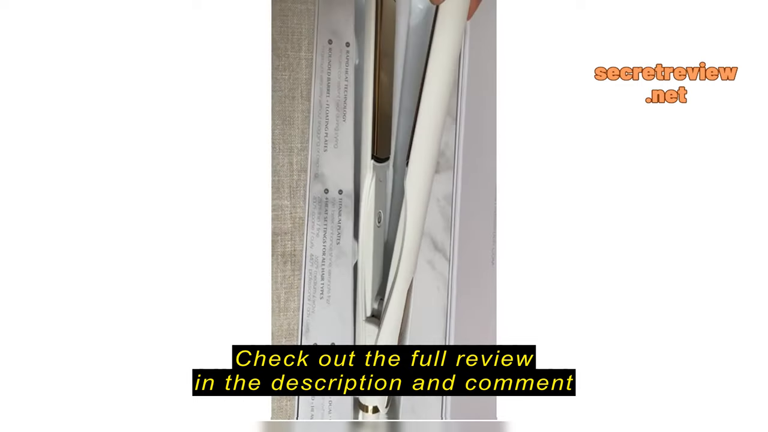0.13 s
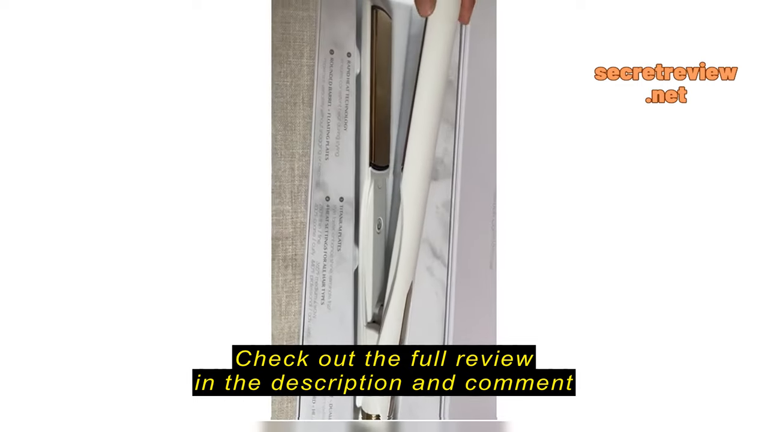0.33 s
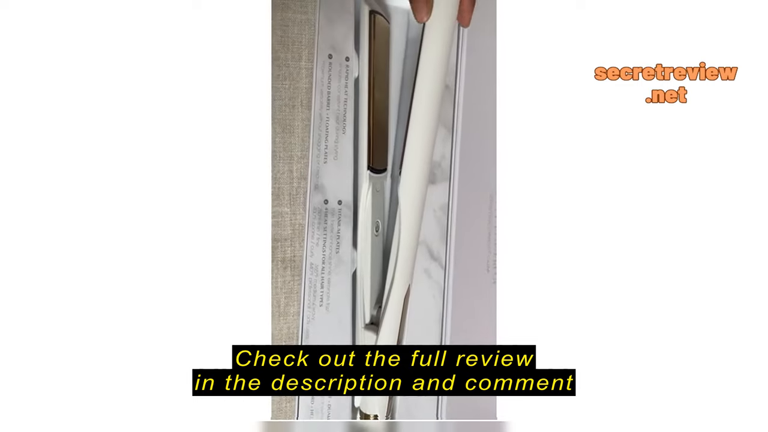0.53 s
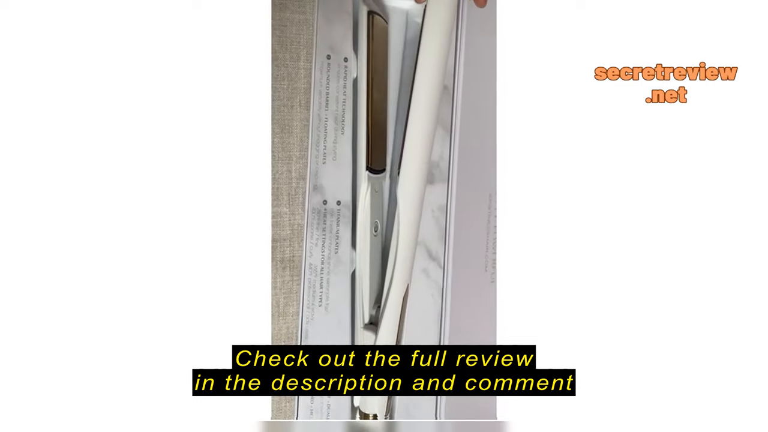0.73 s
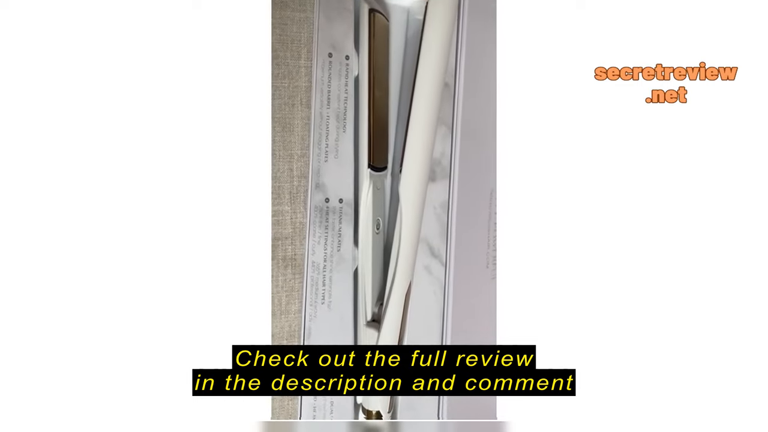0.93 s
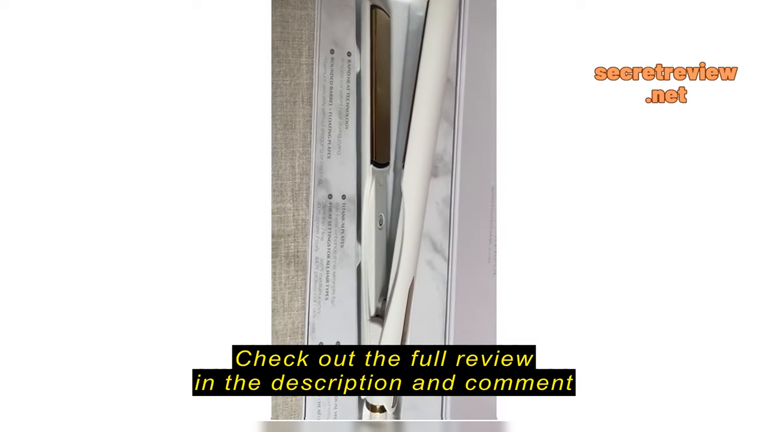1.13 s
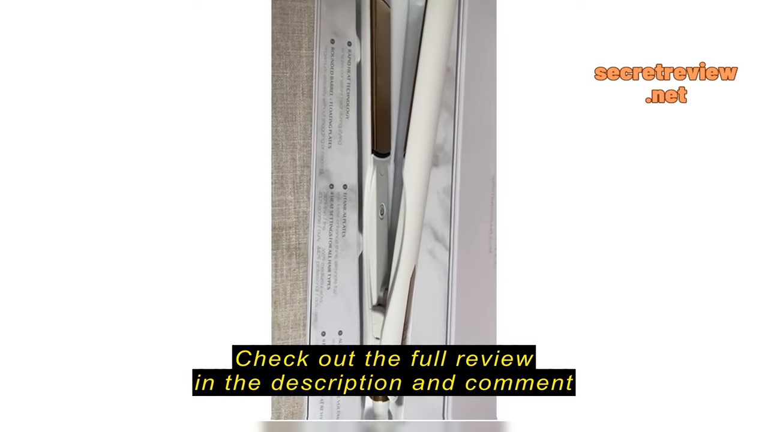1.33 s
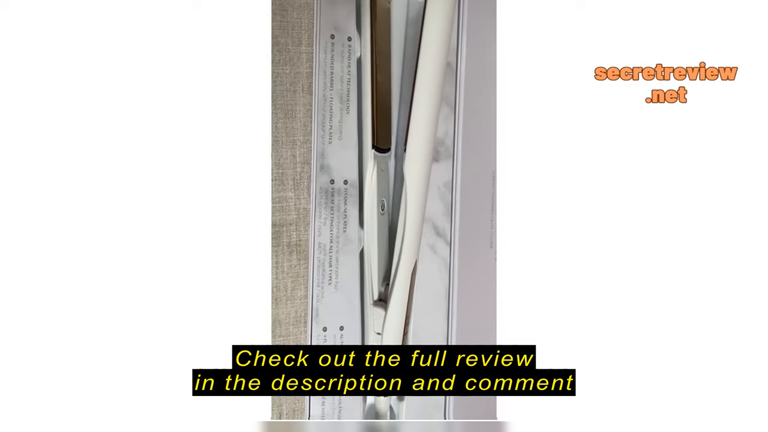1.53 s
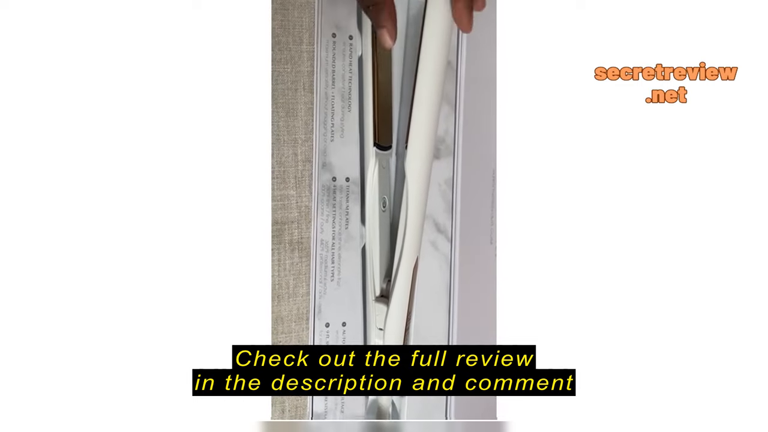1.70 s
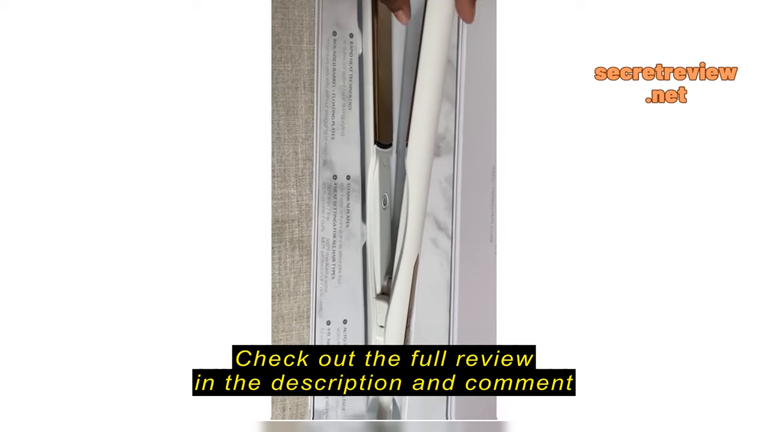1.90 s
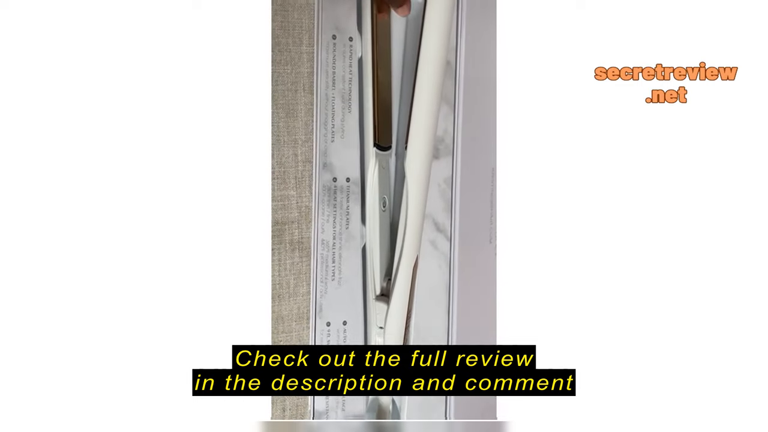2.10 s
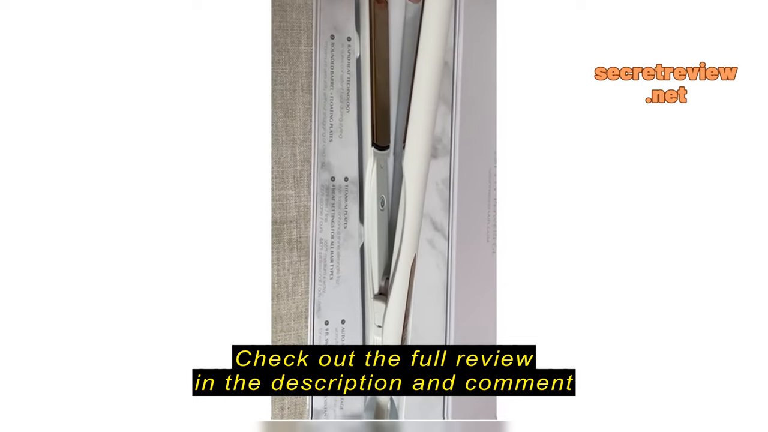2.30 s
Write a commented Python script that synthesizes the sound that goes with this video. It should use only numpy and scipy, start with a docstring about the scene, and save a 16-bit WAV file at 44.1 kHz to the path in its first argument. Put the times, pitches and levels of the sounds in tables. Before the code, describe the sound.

Plastic clacks and dull knocks as a hair straightener is set down on its cardboard box.

```python
"""Hair straightener on its cardboard box

The tool is laid down and nudged about, close to a two-port microphone in a small quiet room.
Each contact thumps the box, clacks the plastic arms, rings the heating plates and gives a short crack.
Between contacts the tool slides on the lid. The room hums and hisses faintly; one faint blip sounds."""
import sys
import numpy as np
from scipy import signal
from scipy.fft import rfft, irfft, next_fast_len
from scipy.io import wavfile
from scipy.ndimage import map_coordinates

SR = 44100
rng = np.random.default_rng(int(sys.argv[2]) if len(sys.argv) > 2 else 0)


def transcribe(u):
    """Save the signal u as a 16-bit wav file named by the first command-line argument.

    u: samples, shape (n,) or (channels, n), limited to [-1, 1]; the rate is SR.
    q: integer samples, one column per channel.
    """
    v = np.clip(np.atleast_2d(u).T, -1, 1)
    q = np.round(v * 32767).astype(np.int16)
    wavfile.write(sys.argv[1], SR, q)


N = 103635

# left-right likeness of diffuse sound: freq_hz, coherence
DIFFUSE_COHERENCE = [(100, 1), (350, .96), (600, 0.19), (1100, 0.94), (2000, 0.19), (4500, 0.48),
                     (10000, 0.067)]


def amp(db):
    """Decibels to gain."""
    return 10 ** (np.asarray(db) / 20)


def unit(x):
    """Scale to rms 1."""
    return x / np.sqrt(np.mean(x ** 2) + 1e-20)


def along(points, hz):
    """Interpolate (freq_hz, value) points on a log axis."""
    freq_hz, values = np.transpose(points)
    return np.interp(np.log(hz + 1), np.log(freq_hz + 1), values)


def wobble(knots_per_s):
    """Smooth random curve."""
    knots = rng.standard_normal(int(N * knots_per_s / SR) + 4)
    return map_coordinates(knots, [np.arange(N) * knots_per_s / SR])


def filtered(x, response):
    """Apply response(hz) by FFT."""
    n = x.shape[-1]
    size = next_fast_len(n + SR // 4)
    return irfft(rfft(x, size) * response(np.fft.rfftfreq(size, 1 / SR)), size)[..., :n]


def coloured(x, spectrum):
    """Apply a (freq_hz, gain_db) curve."""
    return filtered(x, lambda hz: amp(along(spectrum, hz)))


def diffuse(n, coherence=DIFFUSE_COHERENCE):
    """White stereo noise of given left-right coherence."""
    def mid_side_gains(hz):
        angle = np.arccos(np.clip(along(coherence, hz), -1, 1)) / 2
        return np.array([np.cos(angle), np.sin(angle)])
    mid, side = filtered(rng.standard_normal((2, n)), mid_side_gains)
    return np.array([mid + side, mid - side])


def noise(n, spectrum, coherence=DIFFUSE_COHERENCE):
    """Coloured stereo noise, rms 1."""
    return unit(coloured(diffuse(n, coherence), spectrum))


def add(track, start_s, sound):
    """Mix a sound into the track."""
    i = max(round(start_s * SR), 0)
    track[:, i:i + sound.shape[-1]] += sound[..., :N - i]


def ring(modes, t, attack_s, pitch_ratio=1):
    """Damped modes; neighbours swing in opposite directions."""
    swing = sum((-1) ** k * amp(db - 60 * t / t60_s) * np.sin(2 * np.pi * hz * pitch_ratio * t)
                for k, (hz, db, t60_s) in enumerate(modes))
    return swing * (1 - np.exp(-t / attack_s))


def radiated(x, corner_hz=130):
    """Small objects radiate little bass."""
    return signal.sosfilt(signal.butter(2, corner_hz, 'highpass', fs=SR, output='sos'), x)


def ports(x, right_lead):
    """Each microphone port has its own colour and phase."""
    # port balance: freq_hz, left_over_right_db
    balance = [(100, -1.5), (350, 2.7), (600, 2), (1100, 1), (2200, 0.4), (5000, 0.1), (10000, -.3)]
    half = np.array([[.5], [-.5]])
    return filtered(x, lambda hz: amp(half * along(balance, hz))
                    * np.exp(-1j * half * along(right_lead, hz)))


def room(x, early_db=-8.5, early_t60_s=.049, late_db=-10.5, predelay_s=.008):
    """Reflections: near surfaces answer quickly, the walls with a longer tail."""
    # wall decay: freq_hz, t60_s
    wall_decay = [(150, 0.64), (500, 0.24), (1200, 0.34), (3000, 0.27), (6000, 0.32), (12000, 0.31)]
    # early reflections: freq_hz, gain_db
    early_colour = [(200, -16), (400, 3), (600, 4), (1100, -2.5), (2000, 2.5), (2550, -3), (3300, 2.5),
                    (8000, 0.5)]
    n = x.shape[-1]
    t = np.arange(n) / SR
    band_hz, frame_s, bands = signal.stft(diffuse(n), SR, nperseg=256)
    band_decay = amp(-60 * frame_s / along(wall_decay, band_hz)[:, None])
    late = signal.istft(bands * band_decay, SR, nperseg=256)[1][:, :n]
    early = coloured(unit(diffuse(n)), early_colour) * unit(amp(-60 * t / early_t60_s))
    impulse = (amp(early_db) * early + amp(late_db) * unit(late)) / np.sqrt(n)
    impulse = np.pad(impulse, ((0, 0), (round(predelay_s * SR), 0)))
    # a small hard surface nearby returns little bass
    echo_s, echo_db, low_cut_hz = .0112, -12, 1800
    echo = filtered(x, lambda hz: 1j * hz / (low_cut_hz + 1j * hz) * np.exp(-2j * np.pi * hz * echo_s))
    return amp(echo_db) * echo + signal.fftconvolve(x, impulse, axes=1)[:, :n]


def room_air(gain_db=-48.5):
    """Soft room noise, strongest in the bass."""
    # room noise: freq_hz, level_db
    spectrum = [(15, -85), (25, -37), (43, -17), (56, -2), (86, -5), (183, -7.5), (209, -3.5), (246, -8),
                (289, -9.5), (378, -7.5), (631, -12), (1170, -14), (2060, -16.5), (2490, -15.5),
                (4750, -25), (5580, -29), (7300, -35), (10900, -43), (13000, -51), (15500, -72)]
    # left-right likeness: freq_hz, coherence
    coherence = [(100, 1), (330, 0.93), (600, 1), (1100, 0.79), (2200, 0.28), (4500, 0.14), (10000, 1)]
    # right port phase: freq_hz, lead_rad
    right_lead = [(100, -1.5), (380, 1), (600, 2), (1100, 2), (2200, 3), (4500, -0.6), (9000, 5)]
    return amp(gain_db) * ports(noise(N, spectrum, coherence), right_lead)


def hum(gain_db=.5, waver_depth=.81):
    """Low hum lines, wavering in level and phase."""
    # hum lines: pitch_hz, level_db
    lines = [(73, -61), (99.5, -54), (139, -60.5)]
    t, out = np.arange(N) / SR, np.zeros(N)
    for hz, db in lines:
        waver = 1 + waver_depth * wobble(6.44)
        out += amp(db) * unit(waver * np.cos(2 * np.pi * hz * t + wobble(5.46)))
    return amp(gain_db) * out


def drone(pitches_hz=(219, 289.2), waver_rad=.39):
    """Two tones above the hum swell and fade."""
    # tone envelopes: time_s, lower_db, upper_db
    envelopes = [(0, -51, -46), (.2, -49.5, -65), (.6, -47.5, -67), (.78, -78, -59), (.95, -57.5, -62.5),
                 (1.09, -54.5, -52), (1.3, -44.5, -60), (1.45, -63, -61), (1.58, -76, -50.5),
                 (1.72, -73, -57.5), (1.87, -57.5, -63.5), (2.05, -50, -51), (2.22, -54.5, -65),
                 (2.35, -50.5, -53)]
    time_s, *levels_db = np.transpose(envelopes)
    t, out = np.arange(N) / SR, np.zeros(N)
    for hz, db in zip(pitches_hz, levels_db):
        tone = unit(np.cos(2 * np.pi * hz * t + waver_rad * wobble(8.13)))
        out += amp(np.interp(t, time_s, db)) * tone
    return out


def blip(start_s=.6445, level_db=-34.5, top_hz=2000, glide_s=.00133, fall_s=.012):
    """Faint falling blip, opposite in polarity left and right."""
    t = np.maximum(np.arange(N) / SR - start_s, 0)
    hz = top_hz / (1 + t / glide_s) * (t > 0)
    chirp = np.sin(2 * np.pi * np.cumsum(hz) / SR)
    return np.array([[1], [-1]]) * amp(level_db) * np.exp(-t / fall_s) * chirp


def rattle(ticks_per_s=440, low_hz=990, high_hz=6540, t60_s=.0089, spread_db=5):
    """Tiny loose contacts of the plastic, each at its own pitch; rms 1."""
    out, t = np.zeros((2, N)), np.arange(SR // 40) / SR
    for place, size, pitch in rng.random((int(ticks_per_s * N / SR), 3)):
        hz = low_hz * (high_hz / low_hz) ** pitch
        envelope = amp(spread_db * size ** 2 - 60 * t / t60_s)
        add(out, place * N / SR, envelope * np.sin(2 * np.pi * hz * t))
    return unit(out)


def slides(grain_db=1.5, rub_db=3, rattle_db=-3.5):
    """Uneven friction drums the lid, makes it groan, rubs, rattles the plastic and hisses."""
    # strokes on the lid: peak_s, rise_s, fall_s, drum_db, scrape_db, hiss_db, groan_db
    strokes = [(.2475, .004, .006, -33, -44, -30.5, -34), (.012, .033, .049, -29, -46.5, -53, -42),
               (.301, .004, .033, -31, -28, -47, -32), (.417, .011, .017, -30, -31.5, -36.5, -27),
               (.497, .012, .075, -39, -43.5, -53.5, -38), (.715, .03, .03, -62, -68, -63, -62),
               (1.262, .04, .035, -49, -54, -63, -45), (1.295, .02, .03, -47, -58, -67.5, -42)]
    # friction spectra: freq_hz, level_db
    drum_spectrum = [(30, -24), (80, -5.5), (140, -1.5), (200, -4.5), (310, 3), (520, -15), (750, -20.5),
                     (1300, -23), (3000, -45), (8000, -73)]
    rub_spectrum = [(200, -1.5), (700, -6), (1200, -9), (2000, -4), (3200, 2), (5000, -10), (7000, -21),
                    (14000, -39)]
    hiss_spectrum = [(1500, -6), (5000, 2.5), (7200, 0), (10000, 3.5), (12700, -2), (14000, -21),
                     (15000, -7), (16000, -27)]
    groan_spectrum = [(250, -28), (410, -2.5), (472, 0.5), (550, -15), (680, -21.5), (800, -14.5),
                      (950, -16.5), (1400, -30), (4000, -73)]
    t, out = np.arange(N) / SR, np.zeros((2, N))
    drum, rub = noise(N, drum_spectrum), noise(N, rub_spectrum)
    hiss, groan = noise(N, hiss_spectrum), noise(N, groan_spectrum)
    grain = amp(grain_db * wobble(knots_per_s=250))
    scrape = amp(rub_db) * grain * rub + amp(rattle_db) * rattle()
    for peak_s, rise_s, fall_s, drum_db, scrape_db, hiss_db, groan_db in strokes:
        envelope = np.exp(-np.where(t < peak_s, ((peak_s - t) / rise_s) ** 2, (t - peak_s) / fall_s))
        lid = amp(drum_db) * drum + amp(groan_db) * groan
        surface = amp(scrape_db) * scrape + amp(hiss_db) * grain * hiss
        out += envelope * (lid + surface)
    return out


def snaps():
    """Hard edges meet with a very short ping; its pitch depends on the spot."""
    # edge contacts: start_s, level_db, pitch_hz, t60_s
    pings = [(.2958, -14.5, 6160, 0.0051), (.2966, -11.5, 3560, .005), (0.2972, -1, 1390, 0.0012),
             (.3076, -1, 1400, 0.00099), (0.4027, -18, 6550, 0.0017), (.494, -19, 2530, .01),
             (1.084, -32, 1860, .01), (1.2475, -30, 1820, 0.014), (1.414, -28, 5660, 0.0056)]
    out, t = np.zeros((2, N)), np.arange(SR // 2) / SR
    for start_s, db, hz, t60_s in pings:
        ping = radiated(amp(db - 60 * t / t60_s) * np.sin(2 * np.pi * hz * t))[None]
        add(out, start_s, ping + room(ping))
    return out


def knocks(thud_attack_s=.00078, tool_attack_s=.00013, boom_attack_s=.0052, crack_t60_s=.034):
    """Crack, arms and plates sound at once; the box thuds just after, and the room booms."""
    # tool on box: start_s, thud_db, clack_db, plate_db, crack_db, thud_pitch_ratio, clack_pitch_ratio
    contacts = [(.003, -16, -45, -58, -37, 0.81, 1.14), (0.211, -34, -62, -68, -49, 1.24, .7),
                (0.2402, -6.5, -19, -56, -33, 0.73, 1.04), (0.2588, -8, -36, -56, -28, 0.92, 1),
                (0.2949, -46, -30, -20, -16.5, 0.87, 1.24), (0.2965, .5, -13, -20, -18, .88, 0.9),
                (.3045, -5.5, -7.5, -51, -39, 1, 0.922), (0.3114, -8.5, -35, -23, -21.5, 0.92, 1.04),
                (0.396, -43, -13.5, -49, -48, 1.4, 1.2), (0.4023, 2.5, -0.5, -25, -25.5, 0.99, 0.998),
                (0.416, -13, -20, -43, -23, 1.104, 0.93), (.447, -12, -40, -31, -53, 0.85, 0.51),
                (.4885, -16.5, -20, -28, -31.5, 1.243, 1.1), (0.4971, -12, -6, -10.5, -30.5, 1.02, 1.216),
                (0.5081, -14, -27, -42, -40, 0.987, 1.07), (0.582, -27, -50, -55, -59, 0.83, 1),
                (0.667, -27, -54, -59, -67, 0.84, 0.47), (1.083, -24.5, -27, -44, -64, 0.69, 0.61),
                (1.151, -33.5, -58, -60, -45, 1.09, .8), (1.2472, -26, -24.5, -50, -42, 1.13, 0.83),
                (1.2576, -28.5, -38, -36, -39.5, 1.01, 0.86), (1.414, -15, -21.5, -24.5, -38, 0.922, 1.08)]
    # resonances: pitch_hz, level_db, t60_s
    box_modes = [(203, -7.5, 0.022), (283, -3, 0.025), (350, 1, 0.027), (431.4, 2, 0.018), (580, -3, 0.011),
                 (677.4, -10, 0.029)]
    arm_modes = [(727, 1, 0.0036), (1014, 0.5, 0.013), (1108, -3, 0.024), (1354, -8.5, 0.013),
                 (1673, -11, 0.017)]
    plate_modes = [(2300, -8, 0.0079), (2520, 2, 0.024), (2620, 0.5, 0.015), (2910, -8, .012),
                   (3150, -10.5, 0.024), (3950, -8, 0.0063)]
    room_modes = [(77, -35.5, 0.32), (93.3, -54, 0.98), (135.6, -29.5, 0.325), (159, -53, 0.39),
                  (218.5, -32.5, 0.35), (384, -49, 0.25), (475, -36.5, 0.32), (552, -39, 0.15),
                  (663.5, -40, 0.27), (1086, -30, 0.27)]
    # contact noise: freq_hz, level_db
    crack_spectrum = [(80, 6), (400, 12), (1500, 4), (3500, -1), (6000, 0.5), (7300, -9.5), (11500, -13.5),
                      (13500, -85), (16000, -76)]
    out, t = np.zeros((2, N)), np.arange(SR * 2 // 3) / SR
    # warped time: the thud starts sharp and settles in pitch
    lag_s, sharp_share, settle_s = .00023, .26, .0017
    thud_age_s = np.maximum(t - lag_s, 0)
    warped_s = thud_age_s + sharp_share * settle_s * (1 - np.exp(-thud_age_s / settle_s))
    for start_s, thud_db, clack_db, plate_db, crack_db, thud_ratio, clack_ratio in contacts:
        thud = amp(thud_db) * ring(box_modes, warped_s, thud_attack_s, thud_ratio)
        clack = amp(clack_db) * ring(arm_modes, t, tool_attack_s, clack_ratio)
        plates = amp(plate_db) * ring(plate_modes, t, tool_attack_s)
        crack = amp(crack_db - 60 * t / crack_t60_s) * noise(len(t), crack_spectrum)
        boom = amp(thud_db) * ring(room_modes, t, boom_attack_s)
        blow = radiated(thud + clack + plates + crack)
        add(out, start_s, blow + room(blow) + boom)
    return out


def scene():
    """Handling over the background; the tool lies slightly right, so that port leads."""
    # lid reflection: freq_hz, gain_db
    lid_colour = [(30, 0), (80, 0.5), (180, 0.5), (350, -1.5), (560, 0.5), (760, -2), (1150, -1),
                  (1600, -1.5), (2100, -2.5), (2700, -3.5), (3300, -4.5), (5000, -4.5), (10000, -3.5)]
    # right port phase: freq_hz, lead_rad
    right_lead = [(100, 0.024), (350, 0.2), (600, 1.67), (1100, 2.05), (2200, 1.91), (4500, 1.74),
                  (9000, 3.1)]
    handling = coloured(knocks() + snaps() + slides(), lid_colour)
    return ports(handling, right_lead) + blip() + hum() + drone() + room_air()


def record(dry):
    """The recorder rounds off the highest peaks and limits the band."""
    ceiling, top_hz = 1.02, 15700
    rounded = dry / (1 + np.abs(dry / ceiling) ** 6) ** (1 / 6)
    return filtered(rounded, lambda hz: hz < top_hz)


dry = scene()
out = record(dry)
transcribe(out)
```